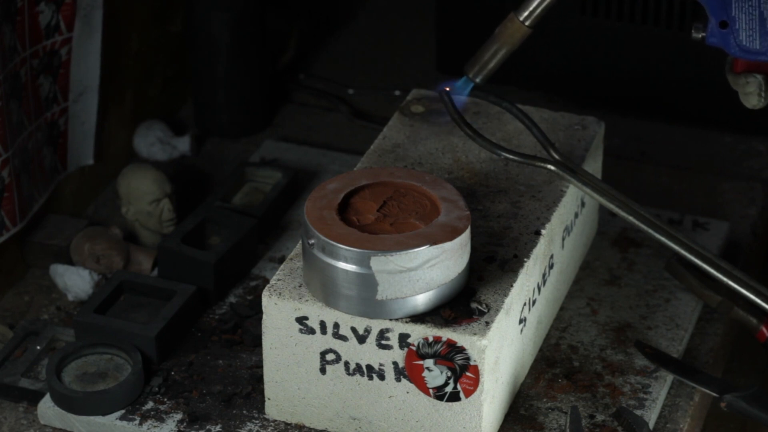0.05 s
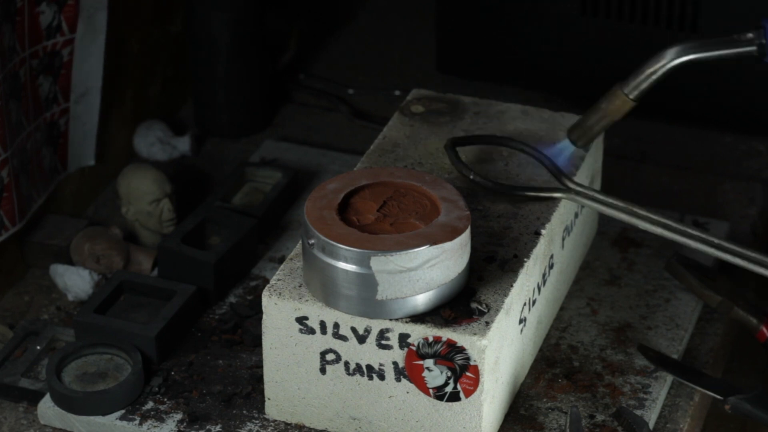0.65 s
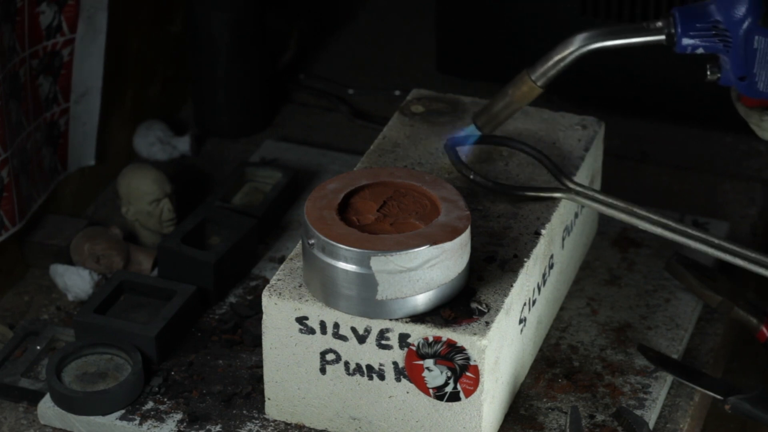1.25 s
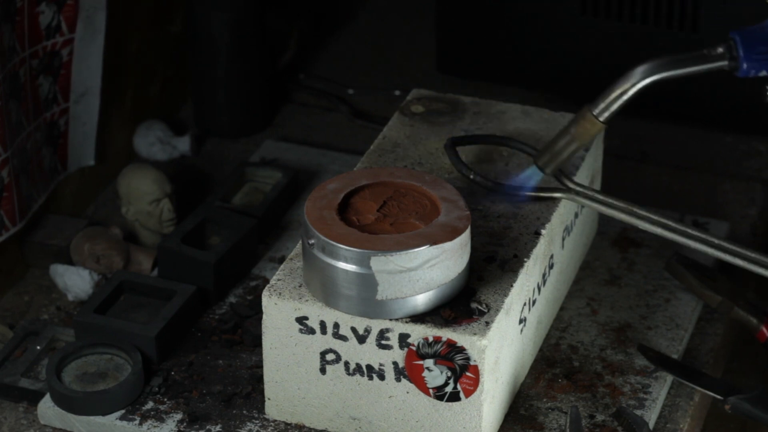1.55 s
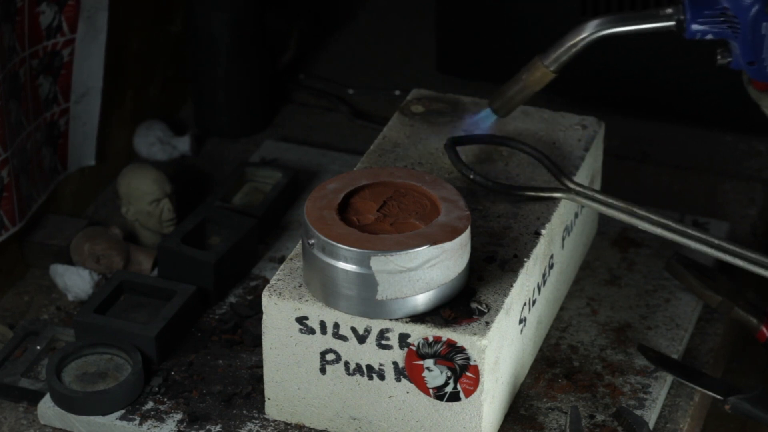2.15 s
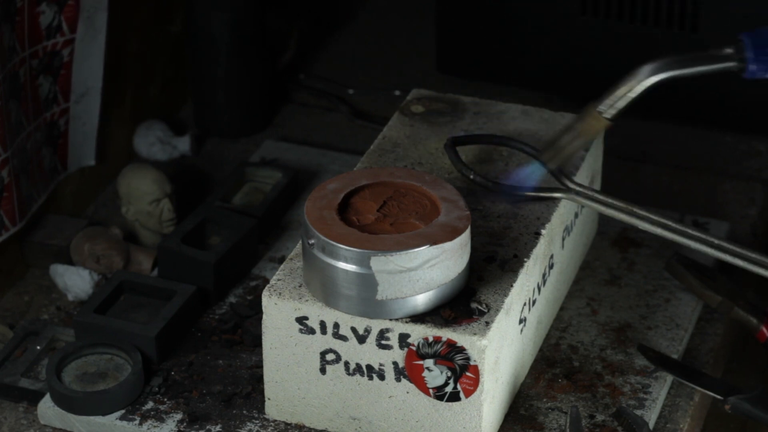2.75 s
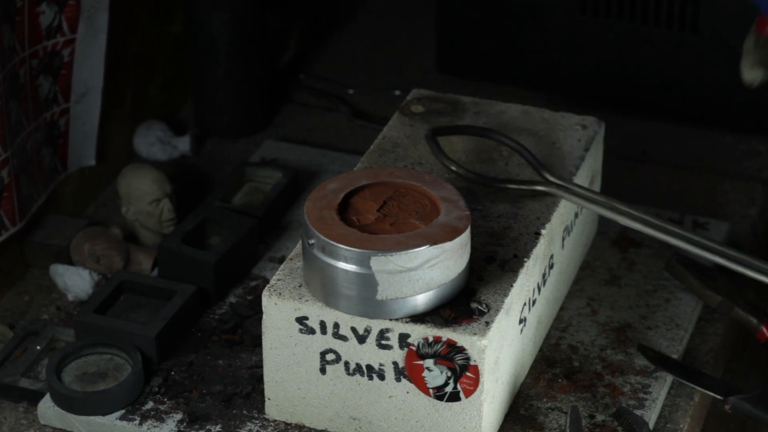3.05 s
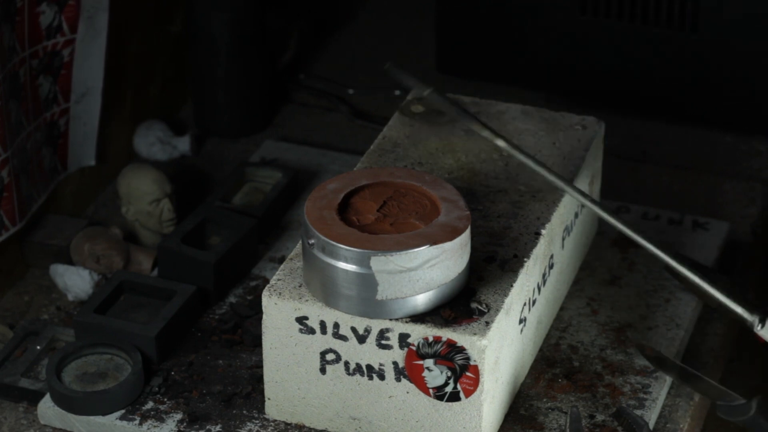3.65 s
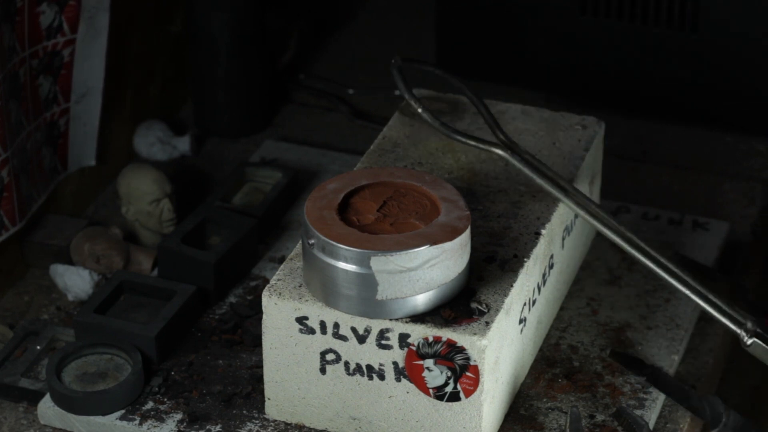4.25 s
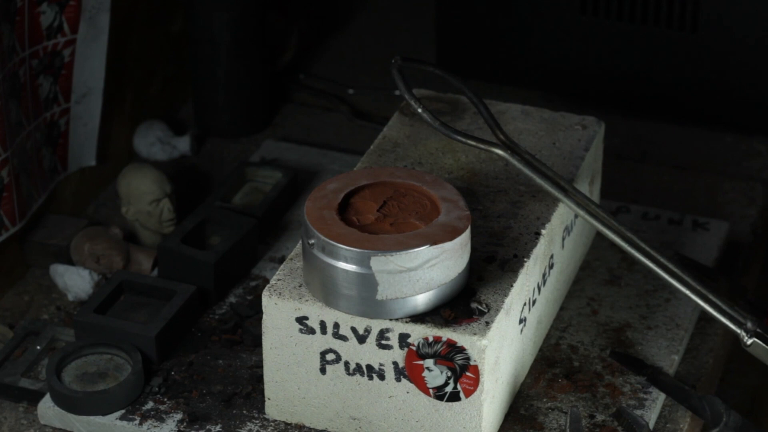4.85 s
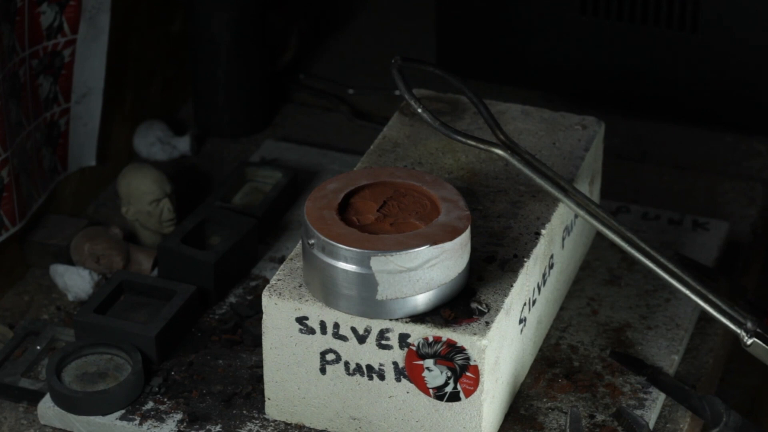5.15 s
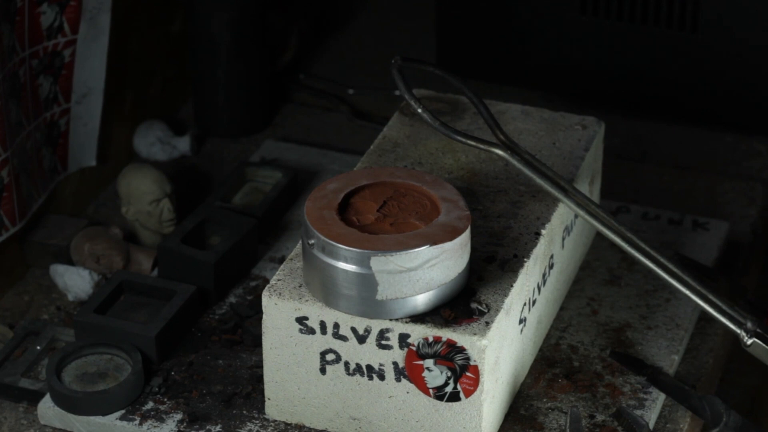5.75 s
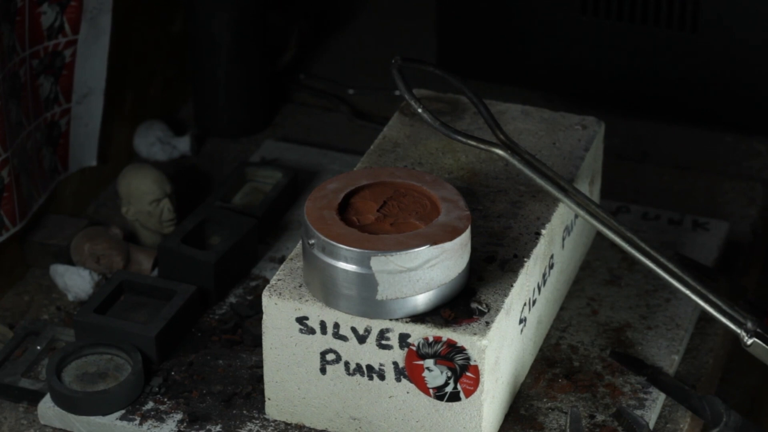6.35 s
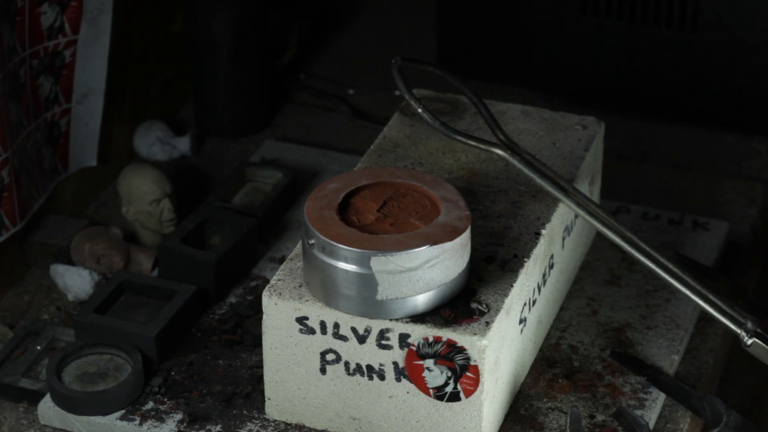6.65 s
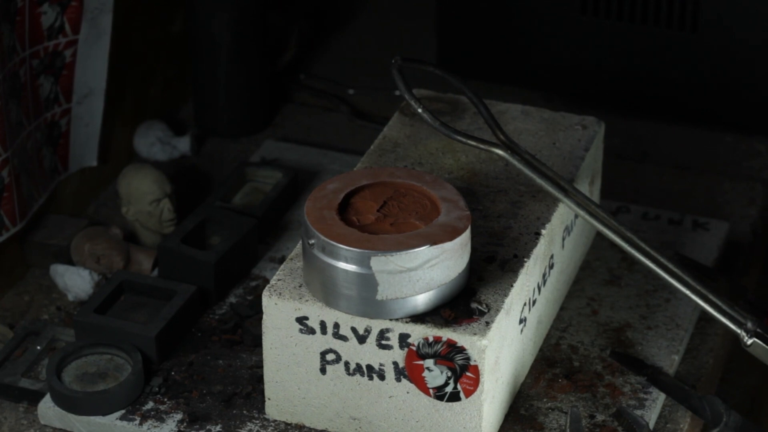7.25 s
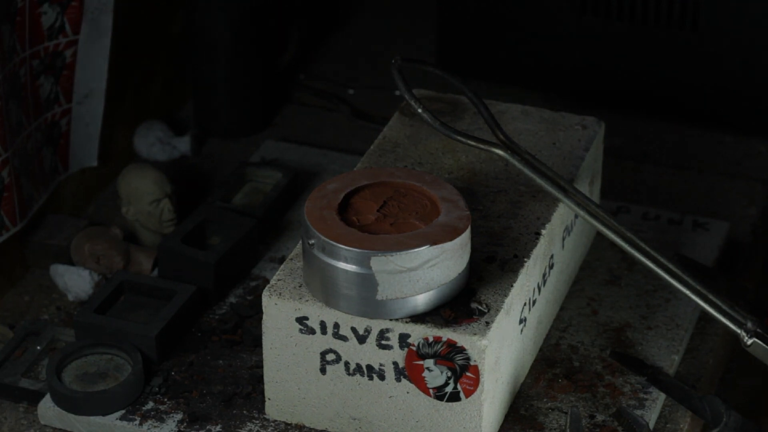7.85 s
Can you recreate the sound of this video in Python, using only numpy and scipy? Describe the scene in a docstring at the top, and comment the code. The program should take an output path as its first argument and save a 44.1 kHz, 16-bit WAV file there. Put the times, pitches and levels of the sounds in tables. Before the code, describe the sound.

A handheld gas torch burns with a steady, hollow roar and hiss in a small workshop. After about three seconds the valve clicks and the flame dies. Tongs touch a brick softly, then the gas bottle is stood on the bench with loud rocking knocks. Faint scrapes and a steel clink follow, then a heavy thump and a tool's clack that hums on. The nearby microphone dips in volume after the loudest blows.

```python
"""First you hear a handheld gas torch roaring over a firebrick: its swirling jet rings the burner tube.
The valve clicks and the flame dies. Tongs are laid on the brick, the gas bottle is stood on the bench,
steel tools clink and scrape, something heavy thumps down, and a tool clacks and hums.
Each struck thing rings with its own notes. Behind it all are a low rush and, at times, a faint whirr.
A nearby camera's gain control turns the sound down after the loudest blows, which also distort."""
import sys
import numpy as np
from scipy import signal
from scipy.fft import rfft, irfft, next_fast_len
from scipy.io import wavfile
from scipy.ndimage import uniform_filter1d, minimum_filter1d, map_coordinates

SR = 44100
rng = np.random.default_rng(int(sys.argv[2]) if len(sys.argv) > 2 else 0)


def transcribe(signal):
    """Save signal, clipped to [-1, 1], as a 16-bit WAV file at the path in sys.argv[1]."""
    frames = np.atleast_2d(signal).T
    limited = np.clip(frames, -1, 1)
    pcm = np.round(limited * 32767).astype(np.int16)
    wavfile.write(sys.argv[1], SR, pcm)


N = 348827

# The clatter of a blow on steel, of a dull knock and of a sharp clack.
# Each row: frequency in Hz, relative level in dB.
STEEL_CLATTER = [(880, -44), (1500, -20.5), (3440, -23), (3650, -23.5), (11900, -25.5), (15500, -44)]
DULL_CLATTER = [(40, -46.5), (87, -10), (250, -0.5), (400, -9.5), (525, -1), (735, -6.5), (870, 1),
                (1000, -4), (2300, -10.5), (3340, -20), (6000, -32.5), (11000, -33), (15500, -43)]
SHARP_CLATTER = [(88, -48), (150, -11), (373, -13), (618, -12.5), (1870, -10), (2760, -12.5), (3600, -15),
                 (6860, -20), (12000, -13), (15500, -28)]


def amp(db):
    """Turn decibels into a number to multiply by."""
    return 10 ** (np.asarray(db) / 20)


def unit(x):
    """Scale a sound to an average (rms) level of 1."""
    return x / np.sqrt(np.mean(x ** 2) + 1e-20)


def along(points, hz):
    """Read between rows of (frequency, value) on a pitch scale."""
    freqs, values = np.transpose(points)
    return np.interp(np.log(hz + 1), np.log(freqs + 1), values)


def clock(size=N):
    """Seconds at each sample."""
    return np.arange(size) / SR


def wobble(rate):
    """A smooth curve through rate random points a second."""
    return map_coordinates(rng.standard_normal(int(N * rate / SR) + 4), [clock() * rate])


def filtered(x, gain):
    """Turn each frequency up or down by gain(hz)."""
    size = next_fast_len(len(x) + 8192)
    return irfft(rfft(x, size) * gain(np.fft.rfftfreq(size, 1 / SR)), size)[:len(x)]


def below(x, edge_hz):
    """Keep the part of a sound below edge_hz."""
    return filtered(x, lambda hz: 1 / (1 + (hz / edge_hz) ** 8))


def noise(colour, size=N):
    """Noise of level 1, coloured by rows of (Hz, dB)."""
    return unit(filtered(rng.standard_normal(size), lambda hz: amp(along(colour, hz))))


def torch(shut_s=3.029, fade_s=0.19):
    """A swirling jet roars through fixed resonances; its hiss and fizz vary with the nozzle's aim."""
    # The nozzle sweeps over the tongs. Each row: time in seconds, then roar, hiss and fizz in relative dB.
    sweep = [(0.0, -17, -29.5, -35), (0.16, -19.5, -31, -39.5), (0.33, -16.5, -29.5, -33.5),
             (0.71, -17.5, -30.5, -38), (0.84, -17, -28, -34), (0.88, -15, -27, -35.5),
             (0.94, -19, -30.5, -37.5), (1.02, -15.5, -26, -34.5), (1.38, -17, -28.5, -38),
             (1.48, -17.5, -27.5, -38.5), (1.76, -16.5, -30.5, -35.5), (1.77, -16, -25, -37),
             (2.06, -16.5, -29.5, -36.5), (2.34, -16, -27.5, -36.5), (2.38, -18.5, -31, -37.5),
             (2.84, -16, -26.5, -32.5), (2.96, -16, -26, -39)]
    # The jet's noise. Each row: frequency in Hz, relative level in dB.
    jet_colour = [(30, -78), (60, -50), (80, -15.5), (100, -12.5), (140, 1.5), (300, -4), (750, -11.5),
                  (1100, -0.5), (1800, -2.5), (3300, -8.5), (4500, -13), (7500, -19), (12000, -22.5),
                  (13500, -28), (15200, -36)]
    # The burner tube and the space over the bench ring.
    # Each row: centre in Hz, half width in Hz, boost in dB.
    resonances = [(217, 29, 7), (280.6, 11.2, 10.5), (331.2, 31.2, 16.5), (449, 59, 13.5), (529, 11, 13.5),
                  (604.2, 48, 19), (723, 24, 17.5), (828.3, 33.6, 21), (884, 38, 17.5), (951.4, 47, 16),
                  (1058, 45, 12), (1160, 14, 6.5), (1316, 10, 5.5), (1410, 12, 12), (1521, 37, 9),
                  (1589, 35, 9.5), (1680, 30, 6.5), (1771, 14, 6), (2023, 15, 10.5), (2335, 35, 7.5),
                  (2702, 34, 5), (2780, 44, 2.5), (3230, 150, 3.5), (3720, 170, 2.5)]
    times, *levels = np.transpose(sweep)
    roar_db, hiss_db, fizz_db = [np.interp(clock(), times, db) + 0.8 * wobble(24) for db in levels]
    boost_db = lambda hz: sum(db * np.exp(-((hz - mid) / width) ** 2) for mid, width, db in resonances)
    jet = filtered(noise(jet_colour), lambda hz: amp(boost_db(hz)))
    long_waves = below(jet, 1650)  # small things reflect only the short waves
    jet = long_waves + bench_echoes(brick_echo(jet - long_waves))
    roar, under_fizz = below(jet, 2580), below(jet, 7260)
    hiss = unit(under_fizz - roar)
    fizz = unit(unit(jet - under_fizz) + amp(-3) * nozzle_breath())
    burn = unit(roar) * amp(roar_db) + hiss * amp(hiss_db - 1) + fizz * amp(fizz_db - 1)
    flow = amp(-60 * np.maximum(clock() - shut_s, 0) / fade_s)  # the gas left in the tube runs out
    return burn * flow * brief_gap()


def brick_echo(x, delay_s=0.0016, sway=0.05, strength=0.2):
    """The brick throws the jet's sound back; the delay sways with the hand and colours the hiss."""
    lag = delay_s * SR * (1 + sway * wobble(2.57))
    return x + strength * map_coordinates(x, [np.arange(N) - lag], order=3)


def bench_echoes(x, strength=0.19, reach_s=0.02, drift=1.63, count=16):
    """Many weak echoes from the bench; the nearest change most as the hand moves the nozzle."""
    out = x.copy()
    for distance in (np.arange(count) + rng.uniform(2, 3, count)) / (count + 2):
        lag = round(distance ** 1.5 * reach_s * SR) + 1
        gain = rng.choice([-1, 1]) * distance + drift * (1 - distance) * wobble(5.01)
        out[lag:] += strength * gain[lag:] * x[:-lag]
    return out


def nozzle_breath(centre_hz=9200, width_hz=410, wander_hz=190):
    """A breathy band of noise from the nozzle's lip; its pitch drifts as the torch turns."""
    band = lambda: filtered(rng.standard_normal(N), lambda hz: np.exp(-(hz / width_hz) ** 2 / 2))
    phase = 2 * np.pi * np.cumsum(centre_hz + wander_hz * wobble(7.8)) / SR
    return unit(band() * np.cos(phase) + band() * np.sin(phase))


def brief_gap(gap_s=0.7306, bump_lag_s=0.0096):
    """The roar's level dips for an instant and comes back with a brief bump."""
    t = clock() - gap_s
    dip = 1 - 0.9 * np.exp(-(t / 0.0033) ** 4)
    bump = amp(3.5 * np.exp(-((t - bump_lag_s) / 0.0065) ** 2))
    return dip * bump


def background(db=-48, drift_db=1.5):
    """The workshop's low rush drifts a little, over mains hum and a thin electronic whine."""
    # The rush. Each row: frequency in Hz, relative level in dB.
    rush_colour = [(20, -16), (50, -8), (70, -7), (200, -4.5), (282, -13), (340, -5.5), (480, -9),
                   (860, -11), (1410, -18.5), (4200, -31), (5400, -27.5), (6400, -35), (8200, -35.5),
                   (10200, -29.5), (12000, -37), (15500, -42)]
    # The hum and whine. Each row: pitch in Hz, level in dB.
    hum_tones = [(49.5, -61.5), (8985, -77), (9981, -76), (10977, -80), (12974, -86)]
    hum = sum(amp(level) * np.sqrt(2) * np.sin(2 * np.pi * hz * clock()) for hz, level in hum_tones)
    return noise(rush_colour) * amp(db + drift_db * wobble(6)) + hum


def blows(hits, modes, clatter, ring_db, clatter_db, clatter_s, attack_s, beat_hz=0, head_on=False):
    """Each blow rings an object's own notes (modes) over a short clatter. A fade is a fall of 60 dB."""
    track, t = np.zeros(N), clock(3 * SR // 2)
    unit_start = lambda x: x / np.sqrt(np.mean(x[:SR // 50] ** 2))  # level 1 over the first 20 ms
    # an object gives off little sound below its lowest note
    low_cut = signal.butter(3, 0.7 * np.min(np.transpose(modes)[0]), "high", fs=SR)
    for start, db in hits:
        ring = np.zeros(len(t))
        for k, (hz, level, fade_s) in enumerate(modes):
            wave = np.sin(2 * np.pi * hz * t)
            if beat_hz:  # two nearly equal halves of a steel tool beat against each other
                twin_hz = hz + beat_hz * rng.uniform(0.54, 1.5)
                wave += 0.75 * np.sin(2 * np.pi * twin_hz * t + rng.uniform(-1, 1))
            sign = 1 if head_on else (-1) ** k  # a head-on blow starts all notes in step
            ring += sign * amp(level + rng.normal(0, 2.2) - 60 * t / fade_s) * wave
        ring = unit_start(signal.lfilter(*low_cut, ring))
        burst = noise(clatter, len(t)) * amp(-60 * t / clatter_s) * (1 - np.exp(-t / attack_s))
        add(track, start, amp(db + ring_db) * ring + amp(db + clatter_db) * unit_start(burst))
    return track


def add(track, start_s, sound):
    """Mix a sound into the track at start_s."""
    part = track[round(start_s * SR):][:len(sound)]
    part += sound[:len(part)]


def valve():
    """The valve clicks shut and faintly rings the tube."""
    # Each row: start in seconds, relative level in dB.
    clicks = [(2.982, -26.5), (3.162, -62)]
    # The tube's notes. Each row: pitch in Hz, relative level in dB, fade in seconds.
    tube_modes = [(2760, -2, 1.6), (4800, -5, 0.59), (5560, -11, 1.2), (6700, -9, .7), (7865, -6.5, 0.7),
                  (8700, -7, .45)]
    return blows(clicks, tube_modes, STEEL_CLATTER,
                 ring_db=-23, clatter_db=1.5, clatter_s=0.043, attack_s=0.0005, beat_hz=13)


def tongs():
    """The tongs touch down on the brick with a dull knock, and their steel arms ring."""
    # Each row: start in seconds, relative level in dB.
    touches = [(3.207, -31), (3.254, -32.5)]
    # The notes of the knock and of the arms. Each row: pitch in Hz, relative level in dB, fade in seconds.
    knock_modes = [(150, 0.5, 0.059), (289, -2, 0.095), (344, -0.5, 0.11), (870, -8, .08),
                   (1170, -15, 0.13), (1296, -11, 0.1)]
    arm_modes = [(2800, -7, .9), (3360, -13, .6), (5940, -13, .8), (6800, -12, .5), (7623, -11, 0.56),
                 (10600, -16, 0.5)]
    knock = blows(touches, knock_modes, DULL_CLATTER,
                  ring_db=1, clatter_db=-11, clatter_s=0.15, attack_s=0.002)
    arms = blows(touches, arm_modes, SHARP_CLATTER,
                 ring_db=-27, clatter_db=-27, clatter_s=0.088, attack_s=0.0005, beat_hz=14)
    return knock + arms


def whirr(hz=5630, db=-65, length_s=0.23, ramp_s=0.018):
    """A thin, slightly unsteady tone, such as a small lens motor makes."""
    # Each entry: start of one whirr in seconds.
    starts = [3.33, 4.35, 6.16, 7.13]
    t = clock()
    running = sum(np.clip(np.minimum(t - start, start + length_s - t) / ramp_s, 0, 1) for start in starts)
    return amp(db) * running * np.sin(2 * np.pi * hz * t + 0.73 * wobble(90))


def scrapes(grit_db=1.7, tilt_from_hz=526, body_db=7, body_width=0.15):
    """Things slide over the gritty bench: rubbing noise swells, catches and rings the sliding object."""
    # Each row: peak time, rise and fall in seconds, level in dB, brightness in dB per octave,
    # the object's note in Hz.
    slides = [(3.712, 0.034, 0.056, -37.5, -2, 910), (4.168, 0.026, 0.037, -31, -8, 563),
              (4.236, 0.017, 0.025, -39, 0.5, 647), (4.345, 0.034, 0.031, -44.5, 1.5, 600),
              (4.5, 0.16, 0.058, -49.5, -2.5, 497), (4.757, 0.036, 0.069, -52.5, 3.5, 1900),
              (5.11, 0.13, 0.13, -44.5, 3, 1220), (5.338, 0.013, 0.053, -31.5, 2, 2200),
              (5.555, 0.059, 0.035, -39, 0.5, 780), (5.65, 0.015, 0.045, -28.5, 2, 1980),
              (7.735, 0.14, 0.096, -51, 2, 2090)]
    # The rubbing noise. Each row: frequency in Hz, relative level in dB.
    rub_colour = [(50, -41), (150, -8), (380, -7.5), (560, 2), (900, -0.5), (2100, -5.5), (3000, -10),
                  (6500, -22), (12000, -29), (15500, -43.5)]
    track, t = np.zeros(N), clock(SR // 2) - 0.25
    for peak, rise, fall, db, tilt, body_hz in slides:
        brightness = lambda hz: tilt * np.log2(np.maximum(hz, tilt_from_hz) / tilt_from_hz)
        body = lambda hz: body_db * np.exp(-((hz / body_hz - 1) / body_width) ** 2)
        rub = filtered(noise(rub_colour, len(t)), lambda hz: amp(brightness(hz) + body(hz)))
        grit = amp(grit_db * unit(uniform_filter1d(rng.standard_normal(len(t)), size=90)))
        stroke = np.exp(-(t / np.where(t < 0, rise, fall)) ** 2)
        add(track, peak + t[0], amp(db) * unit(rub * grit) * stroke)
    return track


def bottle():
    """The gas bottle is stood down and rocks: its flat base knocks fully, its rim thinly."""
    # Each row: start in seconds, relative level in dB, bass cut in Hz, that spot's hollow note in Hz.
    contacts = [(3.7455, -1.5, 50, 495), (3.811, 1, 221, 650), (3.866, -13, 200, 300),
                (4.131, -32.5, 450, 2410), (4.168, -32, 300, 600), (4.211, -32.5, 300, 1450),
                (7.672, -30.5, 120, 327)]
    # The bottle's notes. Each row: pitch in Hz, relative level in dB, fade in seconds.
    bottle_modes = [(90, -7.5, .25), (213, -8, .15), (291, -12.5, 0.36), (353, -0.5, 0.18), (478, 1, .17),
                    (523, 1.5, .18), (653, -10, .2), (823, -5, .2), (871, -1, .17), (1087, -15, 0.33),
                    (1160, -3, .16), (1215, -3.5, 0.16), (1496, -2, .12), (1815, -6, .15),
                    (2200, -1.5, 0.12), (2800, -8.5, .11)]
    track = np.zeros(N)
    for start, db, cut_hz, hollow_hz in contacts:
        knock = blows([(start, db)], bottle_modes, DULL_CLATTER,
                      ring_db=-10, clatter_db=-9, clatter_s=0.18, attack_s=0.0022)
        knock = signal.lfilter(*signal.butter(1, cut_hz, "high", fs=SR), knock)
        hollow = signal.lfilter(*signal.iirpeak(hollow_hz, Q=6.8, fs=SR), knock)
        track += knock + 0.87 * hollow
    return track


def singing(swell_s=0.0076):
    """The struck bottle and the steel tool sing on like tuning forks."""
    # Each row: start in seconds, pitch in Hz, level in dB, fade in seconds.
    notes = [(3.7455, 1545, -38, 1.25), (6.945, 338.5, -38, 3.1), (6.952, 363, -22.5, 0.2)]
    track, t = np.zeros(N), clock(2 * SR)
    for start, hz, db, fade_s in notes:
        loudness = amp(db - 60 * t / fade_s) * (1 - np.exp(-t / swell_s))
        add(track, start, loudness * np.sin(2 * np.pi * hz * t))
    return track


def thumps():
    """Something heavy lands head-on and makes the bench boom."""
    # Each row: start in seconds, relative level in dB.
    landings = [(4.808, -39.5), (6.39, -1.5), (6.3993, -1.5), (6.4085, -8)]
    # The bench's notes. Each row: pitch in Hz, relative level in dB, fade in seconds.
    bench_modes = [(95.3, -2, .12), (144, 2.5, 0.11), (214, 4.5, 0.13), (268, -7, .1), (322, 9, .1),
                   (387, 5.5, 0.1), (453, -4, 0.085), (525, -8, 0.065), (722, -15, .14), (850, -12, 0.15)]
    # Its clatter. Each row: frequency in Hz, relative level in dB.
    bench_clatter = [(25, -16), (60, -31), (110, -2), (330, -2), (520, -8.5), (700, -12.5), (1380, -23),
                     (3000, -35), (6400, -43.5), (8400, -39.5), (15500, -53)]
    return blows(landings, bench_modes, bench_clatter,
                 ring_db=-6.5, clatter_db=-10.5, clatter_s=0.15, attack_s=0.0018, head_on=True)


def clinks():
    """A steel tool clinks and rings with high, beating notes."""
    # Each row: start in seconds, relative level in dB.
    hits = [(5.001, -36), (5.0132, -34)]
    # The steel's notes. Each row: pitch in Hz, relative level in dB, fade in seconds.
    steel_modes = [(2810, -10, .7), (3445, -1, .48), (4011, -17, 1.1), (4280, -5, .45), (4764, -12, .9),
                   (5023, -11, .3), (5280, -2, .24), (5700, -3, .26), (5911, -14, .46), (6317, -9, .65),
                   (7175, -8, .5), (8470, -7, .19), (8920, -10, .2), (10160, -11, .36), (11500, -7, .12)]
    return blows(hits, steel_modes, STEEL_CLATTER,
                 ring_db=-2, clatter_db=-7, clatter_s=0.17, attack_s=0.004, beat_hz=14)


def clacks():
    """A tool ticks, then clacks: sharp clatter with a short ring."""
    # Each row: start in seconds, relative level in dB.
    hits = [(6.915, -39.5), (6.9396, -22)]
    # The tool's notes. Each row: pitch in Hz, relative level in dB, fade in seconds.
    tool_modes = [(1452, -5, 0.18), (1890, -9, 0.12), (1970, -16, 0.13), (2495, -9, 0.15), (3120, -8, .09),
                  (3461, -7, 0.091), (4280, -6, 0.095), (7500, -10, 0.12), (10490, 0.5, 0.054),
                  (11700, -3.5, 0.079)]
    return blows(hits, tool_modes, SHARP_CLATTER,
                 ring_db=-2.5, clatter_db=1.5, clatter_s=0.13, attack_s=0.0022)


def room(x):
    """The small workshop echoes; the treble dies first."""
    # Each row: frequency in Hz, the echo's fade in seconds.
    fades = [(100, 0.45), (400, 0.29), (2000, 0.16), (12000, 0.092)]
    hz, t, spectrum = signal.stft(rng.standard_normal(SR), SR, nperseg=256)
    tail = signal.istft(spectrum * amp(-60 * t / along(fades, hz)[:, None]), SR, nperseg=256)[1]
    tail = np.pad(tail, (SR // 150, 0))  # the echo comes about 7 ms late
    return signal.fftconvolve(x, tail / np.linalg.norm(tail))[:N]


def scene():
    """The flame, then the work at the bench, in one room."""
    flame = torch()
    work = valve() + bottle() + tongs() + thumps() + clinks() + clacks() + scrapes()
    echo = room(amp(-17) * flame + amp(-11.5) * work)
    return (flame + work + singing() + echo + background() + whirr())[None]


def gain_control(x, threshold_db=-14, attack_s=0.024, hold_s=0.084, recovery_db_per_s=23):
    """The volume drops by any excess over the threshold, holds, then climbs back."""
    pole = np.exp(-1 / (attack_s * SR))
    smooth = lambda curve: signal.lfilter([1 - pole], [1, -pole], curve)
    excess_db = np.maximum(10 * np.log10(np.abs(smooth(x ** 2)) + 1e-12) - threshold_db, 0)
    half_hold = round(hold_s * SR / 2)
    held_db = -minimum_filter1d(-excess_db, 2 * half_hold + 1, origin=half_hold)
    climb_db = recovery_db_per_s * clock()
    cut_db = np.maximum.accumulate(held_db + climb_db) - climb_db
    return x * amp(-smooth(cut_db))


def record(dry):
    """The camera turns loud sounds down, flattens peaks at full scale and drops the highest treble."""
    x = gain_control(dry[0])
    x = x / (1 + x ** 8) ** (1 / 8)
    return filtered(x, lambda hz: hz < 15500)[None]


dry = scene()
out = record(dry)
transcribe(out)
```